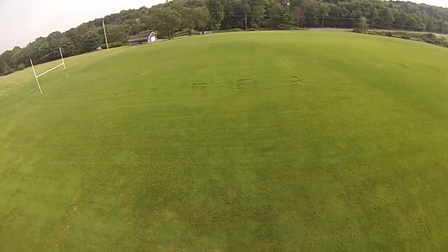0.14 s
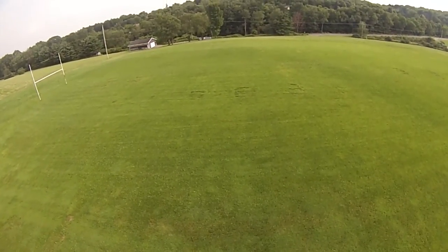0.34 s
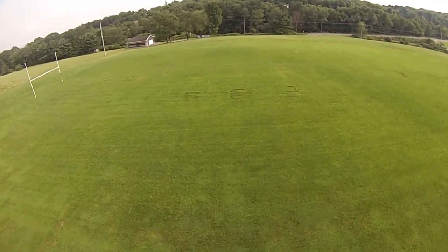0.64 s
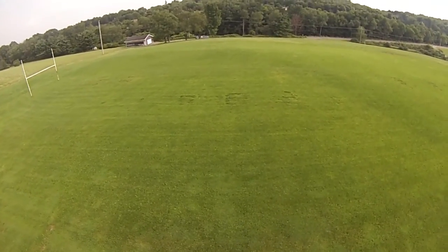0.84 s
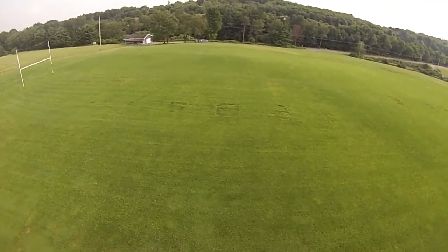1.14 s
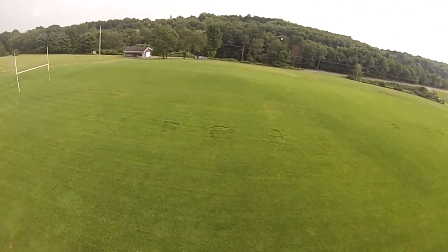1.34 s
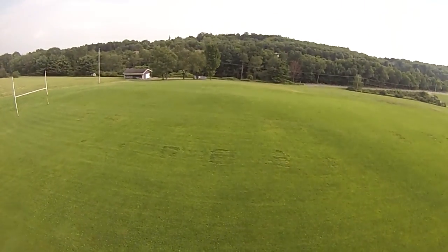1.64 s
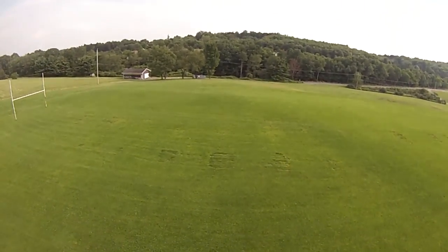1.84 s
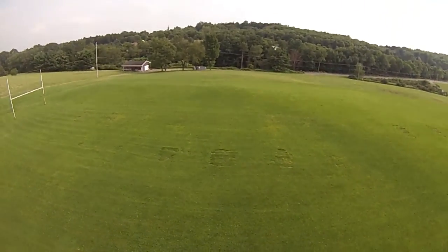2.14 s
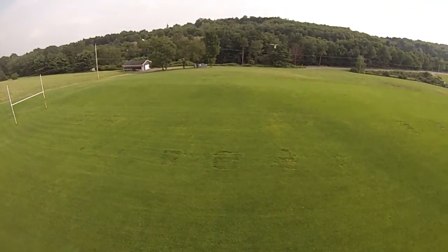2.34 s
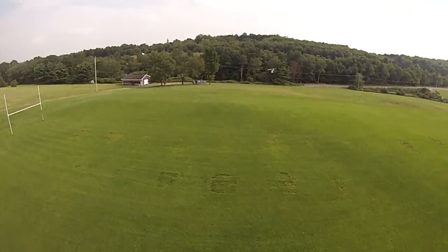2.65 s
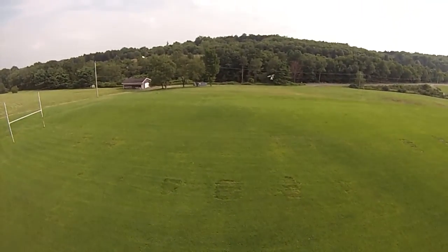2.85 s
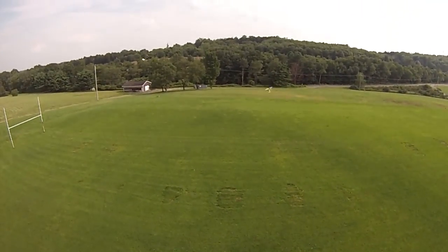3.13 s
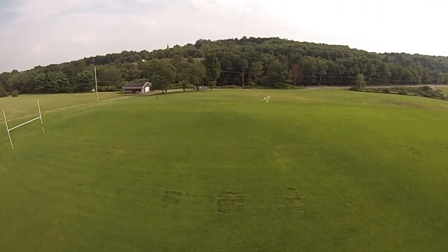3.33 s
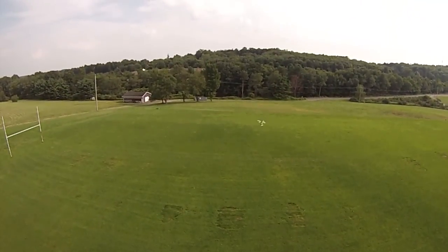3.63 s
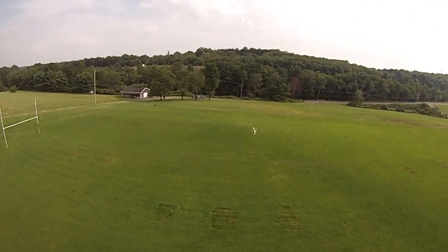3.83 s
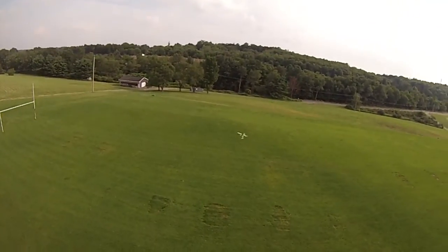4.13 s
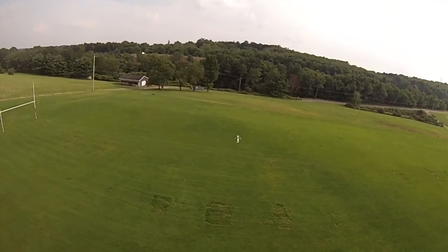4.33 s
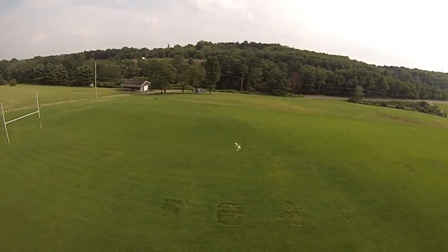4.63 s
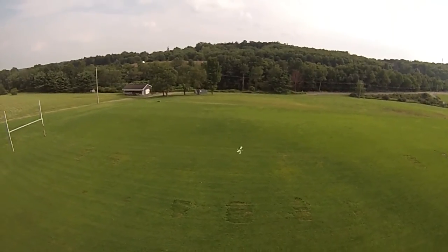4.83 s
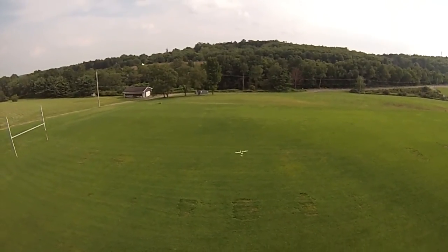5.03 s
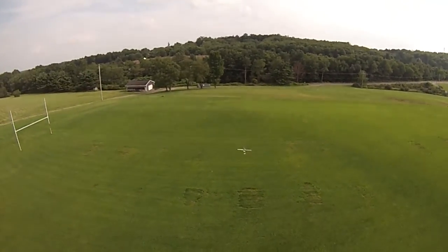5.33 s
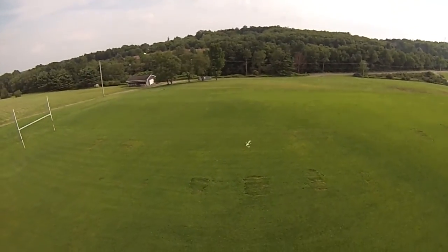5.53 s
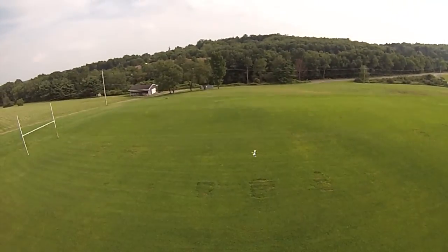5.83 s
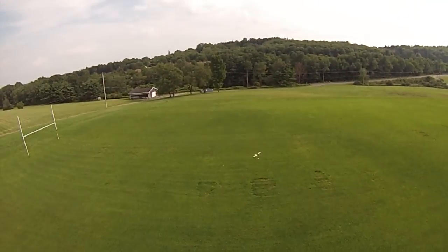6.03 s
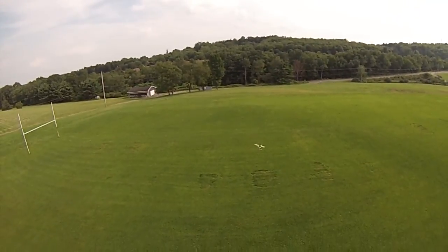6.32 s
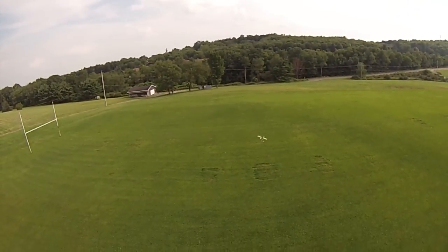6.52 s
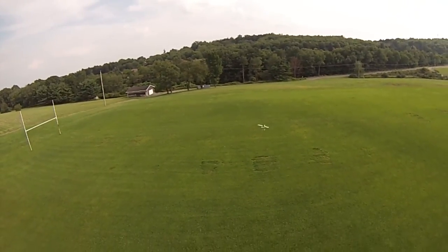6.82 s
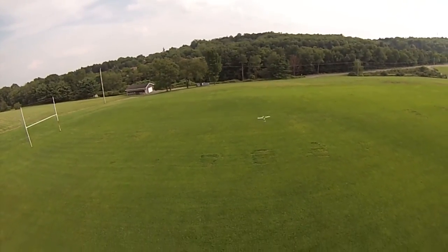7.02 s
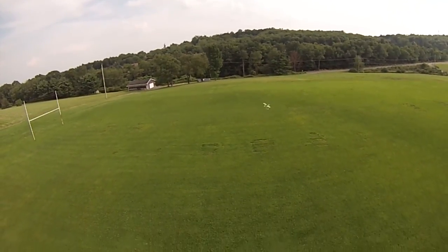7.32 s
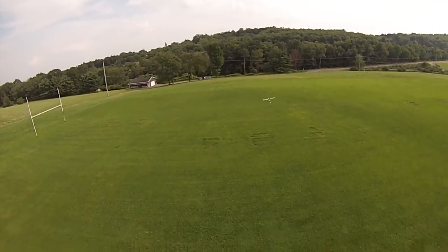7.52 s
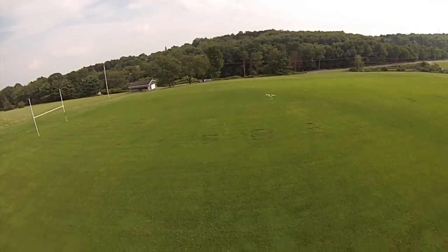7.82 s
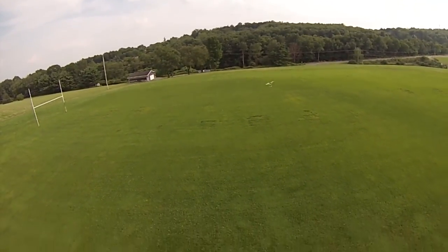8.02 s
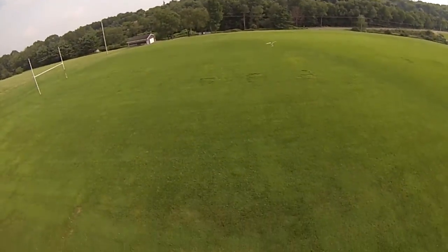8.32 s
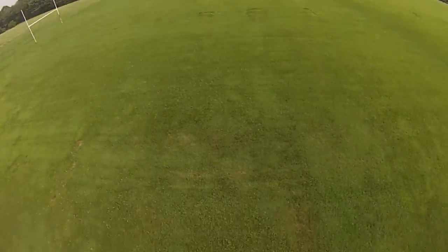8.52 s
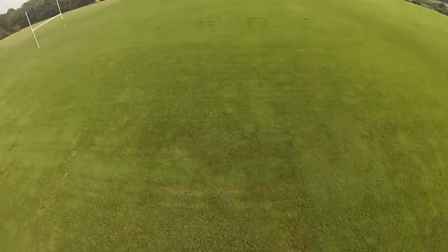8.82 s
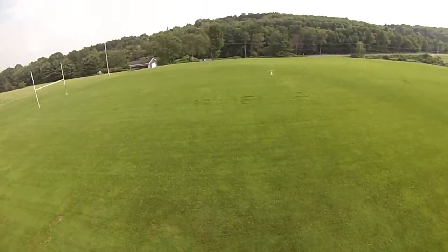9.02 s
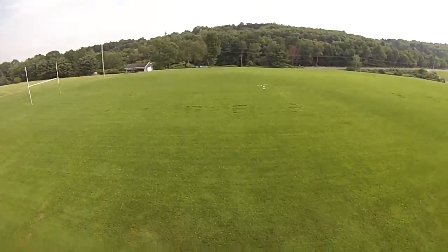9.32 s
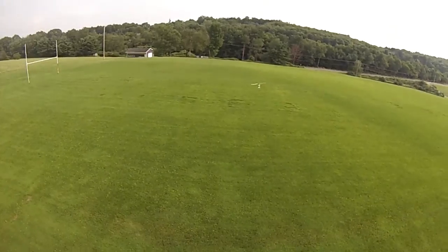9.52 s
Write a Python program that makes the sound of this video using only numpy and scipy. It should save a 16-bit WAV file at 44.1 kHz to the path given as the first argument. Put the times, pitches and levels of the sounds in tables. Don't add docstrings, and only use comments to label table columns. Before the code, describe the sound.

Heard from a microphone strapped to a small quadcopter over an open field: four electric motors drone continuously, deep and buzzy, beating against one another. Chopped propeller air roars through the frame with a thin whine on top. Pitch sags, wobbles midway, then rises late and drops back, while low gusts thump the microphone port.

```python
import sys
import numpy as np
from scipy import signal
from scipy.fft import rfft, irfft, next_fast_len
from scipy.io import wavfile
from scipy.ndimage import map_coordinates

SR = 44100
rng = np.random.default_rng(int(sys.argv[2]) if len(sys.argv) > 2 else 0)


def level_to_linear(level):
    exponent = np.asarray(level, float) / 20
    return 10 ** exponent


def master(y):
    cut = np.clip(np.atleast_2d(y).T, -1, 1)
    pcm = np.round(cut * 32767)
    wavfile.write(sys.argv[1], SR, pcm.astype(np.int16))


N = 426006
T = np.arange(N) / SR

# [t/s, f/Hz]
NEAR_SPEED = [(0, 99.2), (.25, 98.8), (.82, 90.9), (1.45, 90.5), (2.88, 90.6), (3.1, 88.6), (3.5, 89.6),
              (5, 87.2), (5.47, 89.5), (5.8, 95.5), (6.4, 93.3), (6.62, 90.6), (8, 92.9), (8.25, 96.3),
              (8.5, 95.8), (8.8, 100.8), (9.4, 88.3), (9.66, 86.1)]
SWING_SPEED = [(0, 99.8), (.55, 95.4), (.9, 89.8), (1.25, 91), (2, 92.4), (2.3, 89.3), (2.8, 88.4),
               (3.2, 84.2), (4.2, 83.8), (4.55, 79.2), (5.03, 78), (5.47, 74.8), (6.3, 87.8), (6.6, 88.4),
               (7.75, 93), (9, 106.6), (9.5, 99.2), (9.66, 97.8)]
FAR_SPEED = [(0, 99.8), (.5, 95.8), (1.17, 93.1), (1.42, 97.7), (2.2, 96.1), (2.75, 94), (3.3, 89.3),
             (4.98, 88), (5.6, 90.8), (6.6, 90.8), (7, 89.8), (7.5, 90.2), (8.17, 98.5), (8.45, 94.6),
             (8.8, 92.4), (9, 93.2), (9.3, 88.2), (9.66, 86.3)]
REAR_SPEED = [(0, 98.2), (.25, 97), (.8, 90.5), (1.62, 91.1), (3, 91), (3.2, 87.6), (3.7, 86), (4.2, 85.9),
              (4.8, 82.7), (5, 82.9), (5.25, 88.1), (6.38, 90.8), (6.9, 91.6), (7.5, 92.1), (8, 93.2),
              (8.4, 98), (9, 100.2), (9.66, 99.8)]
# [motor 0-3 in the order above, peak t/s, rise/s, fall/s, change f/Hz]
NUDGES = [(0, 1.9, .42, .4, 2.2), (0, 5.25, .22, .22, 5.4), (0, 7.22, .5, .28, 1), (1, 3.7, .25, .4, -1.9),
          (1, 5.21, .14, .2, 10), (0, 4.55, .5, .45, -.35), (1, 7.22, .62, .18, 5.6),
          (1, 8.2, .2, .22, 3.8), (1, 9.2, .2, .3, 6.2), (2, 3.8, .45, .6, 1.7), (2, 5.25, .24, .35, 4.6),
          (2, 5.95, .35, .65, 6.4), (3, 1.35, .25, .27, 3.2), (3, 5.47, .2, .3, -1.2),
          (3, 6.6, .2, .2, -1.9)]
# [t/s, near shake level/dB, swinging load/dB, far load/dB, rear load/dB]
LOADS = [(0, -25.5, -11.5, 5, 7), (.4, -20, 6, -5.5, 3.5), (1.05, -23, 3.5, -0.5, 3.5),
         (1.45, -18, 6.5, 8.5, 5.5), (1.85, -22, 0, 7, -3), (2.2, -24, 2, -2.5, 0),
         (2.9, -19, -3.5, 4.5, 1.8), (3.25, -23.5, 0.5, 12, -7), (3.8, -22, -2, 3.5, -0.2),
         (4.15, -28, -0.5, 3, 3.8), (5.3, -22, -2, -2, -2), (5.9, -18.5, -2.5, 0, 1),
         (6.6, -19, -1, -10, 0.3), (7.2, -18.5, -0.7, -13, -2), (7.8, -16, 1.5, -11, -2.5),
         (8.4, -20.5, -0.5, -2.5, -2), (9, -19, -1.7, 6, 11.5), (9.66, -28, 4, 11.5, -1)]
# [t/s, level/dB, strain/dB brightening tips and magnets, winding current/dB]
AIR = [(0, -22, -1.5, 0), (.5, -22.5, -2.5, 4.5), (.9, -21.5, -3, -2.5), (1.35, -21, -1.5, -1),
       (1.7, -21, -4.5, -0.8), (2.7, -23, -2.5, -4.5), (3.15, -20, -4.5, -4), (3.5, -22, -2.5, 1),
       (4.4, -22, -1.6, -3), (5, -23, -2.2, -4), (6.1, -22.5, -0.5, -12.5), (6.65, -22.5, 0.5, 0.5),
       (7.5, -23, 0.5, 8), (7.9, -22, -1, 0.5), (8.35, -23, -1, 0.5), (8.75, -21, -3.5, 2.5),
       (9.05, -21.5, 0.5, -1.5), (9.66, -21.5, -3, -3)]
# [t/s, level/dB]
MOUNT = [(0, -15), (.7, 1.5), (1.1, -5), (2, -13), (2.7, 7), (3.4, -5), (4, 3), (4.9, 2.5), (5.3, -3),
         (6.2, -3.5), (6.8, 1), (7.8, 0.5), (8.4, -1), (9, -2), (9.3, -10), (9.66, -8)]
# [t/s, level over calm/dB]
GUSTS = [(0.182, 2.5), (.86, 7), (1.319, 5.5), (1.959, 8.5), (3.121, 4), (3.55, 3.5), (4.219, 7.5),
         (4.57, 6), (6.158, 6.5), (6.539, 3.5), (7.02, 6), (7.398, 8.5), (7.801, 8.5), (8.059, 8.5),
         (8.471, 12), (8.739, 13.5), (8.999, 7.5), (9.3, 13.5), (9.6, 9)]
# [t/s, level/dB, recovery/s]
GAIN_DIPS = [
    (2.02, -2, 0.51),
    (5.019, -0.5, 0.63),
]
# [multiple of shaft speed, level/dB, wander f/Hz]
NEAR_ORDERS = [(4, 11, 5), (5, 3, 9), (13, 1, 19)]
SWING_ORDERS = [(4, 6.4, 5.4), (6, 1.2, 10)]
FAR_ORDERS = [(1, 21, 1.6), (4, 8.7, 4.3)]
REAR_ORDERS = [(1, 21, 2.2), (3, 9.7, 5), (5, 5, 9), (6, 1.6, 10), (14, 3.5, 12)]
# [f/Hz, level/dB per Hz]
FRAME = [(60, -41), (130, -20), (240, -29.5), (320, -30.5), (780, -25), (1000, -13), (1700, -15),
         (2300, -29), (3301, -48.5), (5001, -48), (7001, -57.5), (10001, -64.5), (13201, -69),
         (15301, -84.5)]
# [f/Hz, width/Hz, level/dB]
RINGS = [(467.7, 148, 16.5), (592.2, 194, 19), (930, 35, 4.5), (1181, 79, -2.5), (1324, 37, 4.5),
         (1623, 290, 2.5), (1792, 100, -7.5), (1847, 140, 6), (2400, 33, -0.5), (2870, 91, 5.5),
         (3230, 120, 0), (3640, 310, 5), (4480, 281, 5.5), (4821, 131, -7.5), (4880, 111, 5),
         (5640, 551, 8), (6070, 171, 5.5), (6370, 151, -4.5), (6501, 231, 5.5), (7950, 901, 6.5),
         (9231, 401, 4), (10401, 601, 1), (11800, 500, 0.5), (12800, 500, -0.5)]
# [f/Hz, level/dB per Hz]
BUFFET = [(15, -24.5), (36, -2.5), (55, -11.5), (75, -13.5), (150, -24), (300, -65), (900, -130)]
# [f/Hz, level/dB]
PORT = [(12900, -22), (13300, 0), (13700, 0), (14200, -22)]
SWING_BEAT = -33, [(160, 22, 10), (217, 16, 8), (149, 13, 10), (175, 10, 4)]
FAR_BEAT = -36, [(190.6, 6.2, 2.4), (183.8, 1.7, 5.1)]
REAR_FOURTH = -36.5, [(357, 2.8, 2.2), (385, 4.7, 1.7)]
NEAR_SIXTH = -29, [(524, 16, 9), (552, 16, 7)]
MAGNETS = -41, [(1310, 100, 15), (1196, 17, 6)]
SLOTS = -76, [(5060, 170, 19), (4635, 70, 18), (5480, 90, 5), (5230, 90, 7)]
SWING_SLOTS = -76, [(5080, 120, 15), (5350, 110, 14)]

HUNT_HZ, HUNT_RATE_HZ = 0.68, 10
FADE_RATE_HZ = 5.5
CALM_DB, GUST_RISE_S, GUST_FALL_S = -31, 0.13, 0.061
GUST_ROAR = 0.051
LOW, HIGH = -1, 1


def evened(x):
    return x / np.sqrt(np.mean(x ** 2) + 1e-20)


def columns(rows):
    s, *values = np.transpose(rows)
    return [np.interp(T, s, v) for v in values]


def bumps(rows):
    t = T[::64]
    total = sum(size * np.interp(t, [s - rise, s, s + fall], [0, 1, 0]) for s, rise, fall, size in rows)
    return np.interp(T, t, total)


def drift(rate_hz):
    knots = rng.standard_normal(4000)
    coarse = map_coordinates(knots, [T[::32] * rate_hz % 3990], order=3)
    return np.interp(T, T[::32], coarse)


def tone(turns, wander_hz, flutter_db=2.5):
    phase = 2 * np.pi * turns + 0.98 * drift(wander_hz)
    return np.sqrt(2) * np.cos(phase) * level_to_linear(flutter_db * drift(wander_hz))


def bells(hz, rings):
    return sum(db / (1 + (2 * (hz - f0) / width) ** 2) for f0, width, db in rings)


def coloured(x, points, rings=(), part=0):
    size = next_fast_len(N)
    hz = np.fft.rfftfreq(size, 1 / SR)
    f, db = np.transpose(points)
    shape_db = np.interp(np.log(hz + 1), np.log(f + 1), db) + bells(hz, rings)
    share = 1 / np.sqrt(1 + (3000 / (hz + 1)) ** (12. * part))
    return evened(irfft(rfft(x, size) * level_to_linear(shape_db) * share, size)[:N])


def favoured(hz, response, load_db, fade_db):
    floor_db, rings = response
    extra_db = load_db + fade_db * drift(FADE_RATE_HZ)
    db = floor_db + bells(hz[::64], rings) + extra_db[::64]
    return np.interp(T, T[::64], level_to_linear(db))


def motor_speeds():
    courses = (NEAR_SPEED, SWING_SPEED, FAR_SPEED, REAR_SPEED)
    speeds = []
    for motor, course in enumerate(courses):
        nudges = [row[1:] for row in NUDGES if row[0] == motor]
        speeds.append(columns(course)[0] + bumps(nudges))
    return speeds


def shaft_turns(hz):
    return np.cumsum(hz + HUNT_HZ * drift(HUNT_RATE_HZ)) / SR


def blade_air(near, swing):
    chop = 1 + 0.12 * np.cos(2 * np.pi * near) + 0.18 * np.cos(4 * np.pi * near)
    chop += 0.2 * np.cos(4 * np.pi * swing)
    body = rng.standard_normal(N) * level_to_linear(0.77 * drift(14))
    tips = rng.standard_normal(N) * chop * level_to_linear(0.4 * drift(7) + 0.8 * drift(35))
    return body, tips


def weak_orders(turns, table):
    return sum(level_to_linear(db - 33) * tone(k * turns, wander_hz) for k, db, wander_hz in table)


def unbalanced_shaft(near, shake_db):
    shake = level_to_linear(shake_db - 0.64 + 0.6 * drift(FADE_RATE_HZ))
    return shake * (tone(near, 2.7, 0.45) + level_to_linear(-24) * tone(3 * near, 5, 3.3))


def blade_beats(swing, far, swing_hz, far_hz, swing_db, far_db):
    swing_beat = favoured(2 * swing_hz, SWING_BEAT, swing_db, 3) * tone(2 * swing, 2.5, 0.3)
    far_beat = favoured(2 * far_hz, FAR_BEAT, far_db, 2.6) * tone(2 * far, 3, 0.88)
    return swing_beat + far_beat


def motor_whine(turns, speeds, rear_db, strain_db):
    near, swing, _, rear = turns
    near_hz, swing_hz, _, rear_hz = speeds
    fourth = favoured(4 * rear_hz, REAR_FOURTH, rear_db, 2.4) * tone(4 * rear, 6, 2.2)
    sixth = favoured(6 * near_hz, NEAR_SIXTH, columns(MOUNT)[0], 2.5) * tone(6 * near, 12)
    magnets = favoured(14 * swing_hz, MAGNETS, 1.5 * strain_db, 3) * tone(14 * swing, 20)
    return fourth + sixth + magnets


def slot_whine(turns, speeds, current_db):
    near, swing, _, rear = turns
    near_hz, swing_hz, _, rear_hz = speeds
    sources = [(near, near_hz, SLOTS), (rear, rear_hz, SLOTS), (swing, swing_hz, SWING_SLOTS)]
    slots = sum(favoured(56 * hz, response, current_db, 2.5) * tone(56 * shaft, 110)
                for shaft, hz, response in sources)
    return level_to_linear(-51 + 1.4 * drift(12)) * coloured(slots, FRAME, RINGS)


def controller_hum(near):
    update = 501.2 * T
    hum = level_to_linear(-38.5) * tone(update, 3)
    below = level_to_linear(-37.5) * tone(update - near, 4.5)
    above = level_to_linear(-26) * tone(update + near, 6)
    return hum + below + above


def folded_switching(swing):
    switch_hz = 16810
    return level_to_linear(-85) * coloured(tone(switch_hz * T - 42 * swing, 60), PORT)


def port_buffet(gust_db):
    return level_to_linear(CALM_DB + gust_db - 3) * coloured(rng.standard_normal(N), BUFFET)


def scene():
    speeds = motor_speeds()
    near_hz, swing_hz, far_hz, rear_hz = speeds
    turns = [shaft_turns(hz) for hz in speeds]
    near, swing, far, rear = turns
    shake_db, swing_db, far_db, rear_db = columns(LOADS)
    air_db, strain_db, current_db = columns(AIR)
    gust_db = bumps([(s, GUST_RISE_S, GUST_FALL_S, db) for s, db in GUSTS])
    air_db = air_db + 1.52 + GUST_ROAR * gust_db

    body, tips = blade_air(near, swing)
    shafts = weak_orders(near, NEAR_ORDERS) + weak_orders(swing, SWING_ORDERS)
    shafts += weak_orders(far, FAR_ORDERS) + weak_orders(rear, REAR_ORDERS)
    mix = level_to_linear(air_db + 5) * coloured(body + shafts, FRAME, RINGS, part=LOW)
    mix += level_to_linear(air_db + strain_db - 19.5) * coloured(tips, FRAME, RINGS, part=HIGH)
    mix += unbalanced_shaft(near, shake_db)
    mix += blade_beats(swing, far, swing_hz, far_hz, swing_db, far_db)
    mix += motor_whine(turns, speeds, rear_db, strain_db)
    mix += slot_whine(turns, speeds, current_db)
    mix += level_to_linear(air_db + 19.5) * controller_hum(near)
    mix += folded_switching(swing)
    mix += port_buffet(gust_db)
    return mix[None]


def band_limit(x):
    return signal.sosfilt(signal.butter(12, 15240, fs=SR, output="sos"), x)


def record(dry):
    dips_db = bumps([(s, 0.03, recovery_s, db) for s, db, recovery_s in GAIN_DIPS])
    gain = np.minimum(T / 0.0023, 1) * level_to_linear(dips_db)
    mix = 1.2 * np.tanh(dry * gain / 1.2)
    return band_limit(mix)


dry = scene()
out = record(dry)
master(out)
```